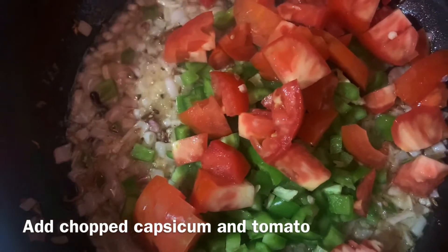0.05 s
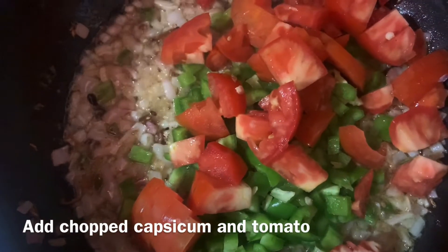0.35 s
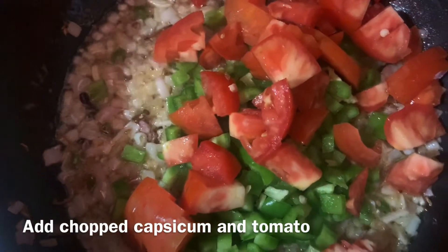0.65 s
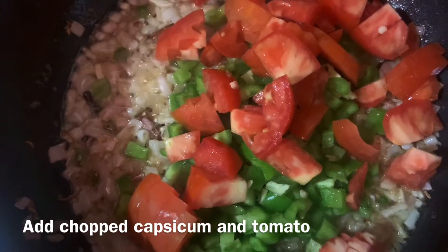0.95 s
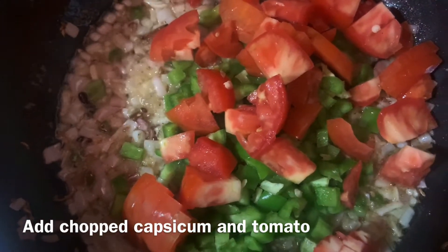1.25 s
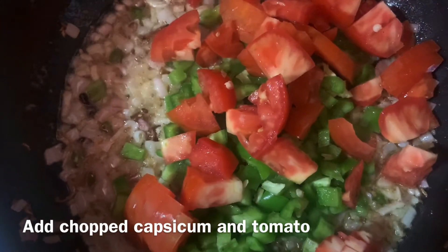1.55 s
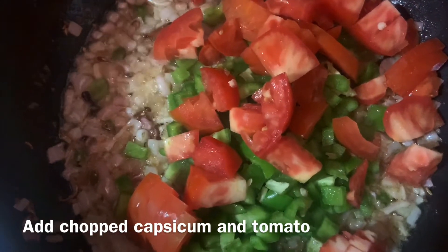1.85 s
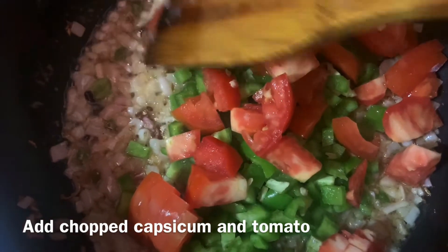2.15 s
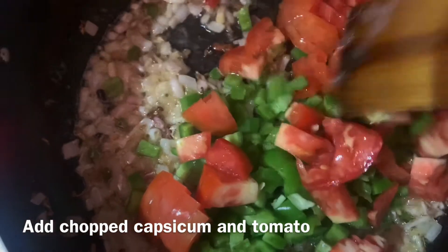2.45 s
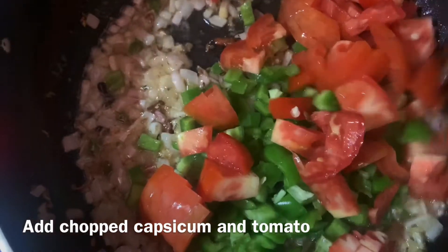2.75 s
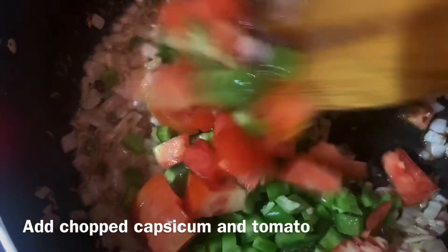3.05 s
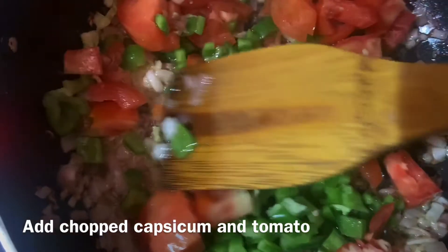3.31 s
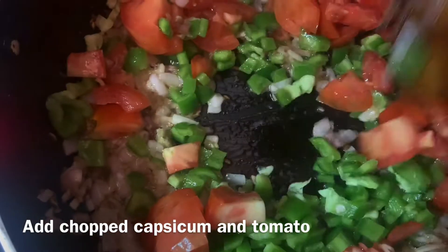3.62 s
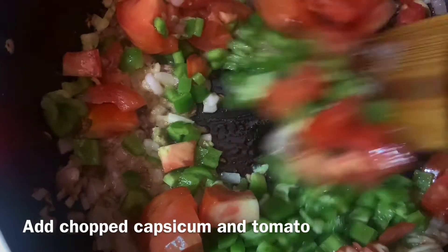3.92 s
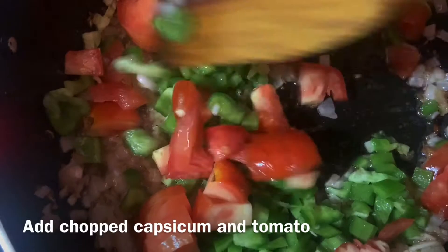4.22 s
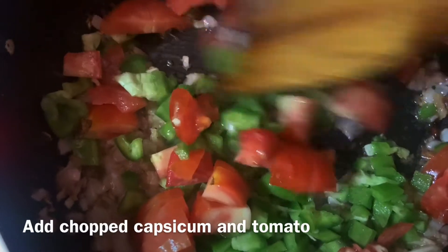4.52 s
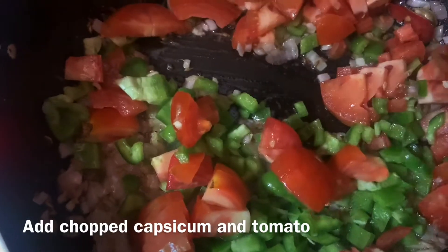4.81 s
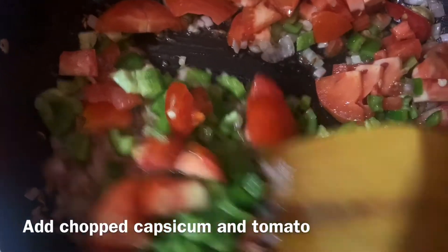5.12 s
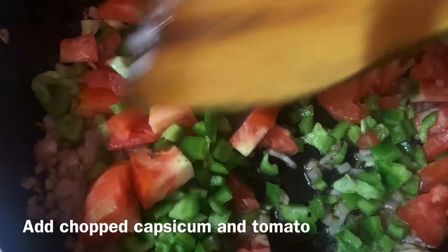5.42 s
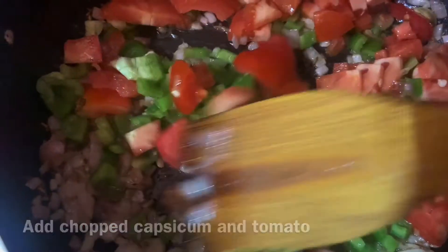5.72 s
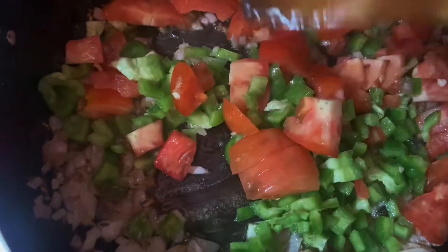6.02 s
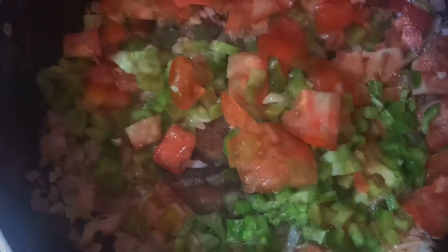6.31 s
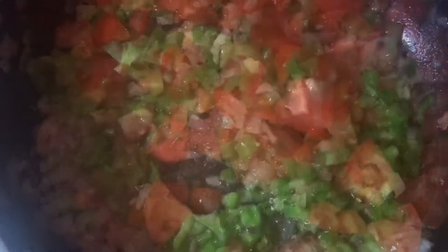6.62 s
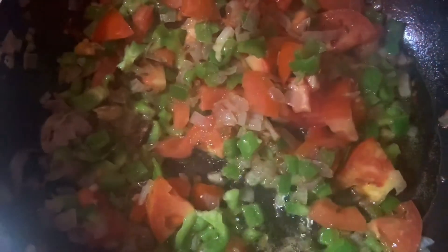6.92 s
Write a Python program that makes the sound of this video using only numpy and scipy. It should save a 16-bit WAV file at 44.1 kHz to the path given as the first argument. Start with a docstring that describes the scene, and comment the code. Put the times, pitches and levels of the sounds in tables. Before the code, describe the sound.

Chopped onion, pepper and tomato sizzle steadily in a hot pan, with sharp little spits of fat and a soft simmer of juice. A dull knock on the worktop and a utensil clink come early. Then a wooden spatula stirs with soft taps and faint scrapes, striking the pan more sharply near the end. A low burner rumble and hum lie underneath, heard close up in a home kitchen.

```python
"""Vegetables frying in a pan

Chopped onion, capsicum and tomato fry on a gas ring while a wooden spatula taps, scrapes and turns them. Tiny
steam bubbles burst in the fat, water drops spit and the juice simmers; burner and kitchen rumble below. Early
on the worktop is knocked and a utensil clinks. Two close microphones hear the pan's crackle alike in the lows,
while in the treble the right channel lags a little behind the left."""
import sys
import numpy as np
from scipy import signal
from scipy.fft import rfft, irfft, next_fast_len
from scipy.io import wavfile
from scipy.ndimage import uniform_filter1d

SR = 44100
rng = np.random.default_rng(int(sys.argv[2]) if len(sys.argv) > 2 else 0)


def inscribe(sig):
    """Save sig as 16-bit PCM at rate SR to the path in sys.argv[1].

    A 1-D sig is mono; a 2-D sig holds one channel per row.
    Samples are clipped to [-1, 1] before scaling.
    """
    pcm = np.round(np.clip(np.atleast_2d(sig).T, -1, 1) * 32767)
    wavfile.write(sys.argv[1], SR, pcm.astype(np.int16))


N = 311345
TIME = np.arange(N) / SR


def from_db(db):
    return 10 ** (np.asarray(db) / 20)


def unit_rms(x):
    return x / np.sqrt(np.mean(x ** 2) + 1e-20)


def in_time(rows):
    """Each value column of a time curve, per sample."""
    times, *columns = np.transpose(rows)
    return [np.interp(TIME, times, column) for column in columns]


def at_hz(points, hz):
    """Interpolate on a log-frequency axis."""
    known_hz, values = np.transpose(points)
    return np.interp(np.log(hz + 1), np.log(known_hz + 1), values)


def shaped(x, gain_at):
    """Filter by a gain given as a function of frequency."""
    size = next_fast_len(N + SR // 10)
    hz = np.fft.rfftfreq(size, 1 / SR)
    return irfft(rfft(x, size) * gain_at(hz), size)[..., :N]


def colour(x, spectrum):
    """Filter by a spectrum table; rms 1."""
    return unit_rms(shaped(x, lambda hz: from_db(at_hz(spectrum, hz))))


def drift(rate_hz):
    """Slow random wander; rms 1."""
    return unit_rms(shaped(rng.standard_normal(N), lambda hz: 1 / (1 + (hz / rate_hz) ** 2)))


def resonate(x, hz, width_hz):
    """Two-pole resonance, peak gain 1."""
    r = np.exp(-np.pi * width_hz / SR)
    numerator = np.array([1, 0, -1]) * (1 - r * r) / 2
    denominator = [1, -2 * r * np.cos(2 * np.pi * hz / SR), r * r]
    return signal.lfilter(numerator, denominator, x + 1e-18)


def steep_resonance(x, hz, width_hz):
    """Two equal resonances in series; rms 1."""
    return unit_rms(resonate(resonate(x, hz, width_hz), hz, width_hz))


def butterworth(x, edges_hz, kind):
    return signal.sosfilt(signal.butter(2, edges_hz, kind, fs=SR, output="sos"), x)


def add_at(track, start_s, sound):
    start = round(start_s * SR)
    track[start:start + len(sound)] += sound


def bursts(per_s, spread_db=0.0):
    """Random clicks at a running rms of 1; spread makes a few much larger."""
    sizes = from_db(spread_db * np.minimum(rng.exponential(1, N), 5.5))
    clicks = sizes * rng.choice([-1, 1], N) * (rng.random(N) < per_s / SR)
    return clicks / np.sqrt(uniform_filter1d(clicks ** 2, SR // 4) + 1e-9)


def bubbles(clicks, low_hz, high_hz, q, pitch_count):
    """Each click rings one bubble of random pitch for a few cycles; rms 1."""
    choice = rng.integers(0, pitch_count, N)
    pitches = np.geomspace(low_hz, high_hz, pitch_count)
    return unit_rms(sum(resonate(clicks * (choice == k), hz, hz / q) for k, hz in enumerate(pitches)))


# Diffuse field: f/Hz, left-right coherence
COHERENCE = [(100, 1), (250, 0.97), (400, 0.68), (560, 0.53), (720, 0.2), (1100, 0.62), (1700, 0.91),
             (2400, 0.63), (3200, 0.031), (4000, 0.1)]

def all_round(mid, side):
    """Two unrelated signals form a diffuse stereo field, alike in the bass."""
    def side_gain(hz):
        coherence = np.clip(at_hz(COHERENCE, hz), 0, .999)
        return np.sqrt((1 - coherence) / (1 + coherence))
    return mid + shaped(side, side_gain) * [[1], [-1]]


def from_pan(x, lag_s=.000233, alike_below_hz=2470):
    """The two channels agree in the lows; above a corner frequency the right one lags a little."""
    right = shaped(x, lambda hz: np.exp(-2j * np.pi * np.maximum(hz - alike_below_hz, 0) * lag_s))
    return np.array([x, right])


def reflections(x, t60_s=.067):
    """Hob and wall return a short, dense tail, different on each side."""
    t = TIME[:SR // 2]
    tails = rng.standard_normal((2, len(t))) * from_db(-60 * t / t60_s)
    tails /= np.sqrt(np.sum(tails ** 2, axis=1, keepdims=True))
    return signal.fftconvolve(x[None], tails, axes=1)[:, :N]


# Burner and kitchen: t/s, level/dB
RUMBLE_LEVEL = [(0, -40.5), (5.0, -40.5), (6.1, -41.5), (6.4, -44.5), (7.06, -41)]
# Low rush: f/Hz, level/dB
RUMBLE_SPECTRUM = [(20, -50), (35, -31), (55, -12.5), (78, -12), (95, -3.5), (125, 3), (175, -2.5),
                   (240, -2), (305, -7), (400, -4.5), (540, -9.5), (660, -30), (800, -10), (1100, -102)]
# Narrow noise bands: f/Hz, width/Hz, level/dB
RUMBLE_DRONES = [(148.5, 11, -52.5), (203, 27, -50.5), (240.8, 29, -50), (386, 55, -49.5), (478, 36, -51),
                 (561, 15, -51.5)]

def rumble(rush_gain_db=1.0, low_cut_hz=32):
    """Low rush of burner and kitchen, with a few wavering drones."""
    level_db, = in_time(RUMBLE_LEVEL)
    mid, side, drive = rng.standard_normal((3, N))
    rush = all_round(colour(mid, RUMBLE_SPECTRUM), colour(side, RUMBLE_SPECTRUM))
    rush = butterworth(rush, low_cut_hz, "high")
    drones = sum(from_db(db) * steep_resonance(drive, hz, width) for hz, width, db in RUMBLE_DRONES)
    return from_db(level_db + rush_gain_db) * rush + from_db(level_db - level_db.mean()) * drones


def hum(pitch_hz=103.2, wander_hz=3.1, gain_db=-5.0):
    """A low tone that follows the rumble's level, swelling and wavering in pitch at random."""
    level_db, = in_time(RUMBLE_LEVEL)
    phase = 2 * np.pi * np.cumsum(pitch_hz + wander_hz * drift(rate_hz=4.21)) / SR
    swell = 1 + .4 * drift(rate_hz=7)
    return from_db(level_db + gain_db) * swell * np.sqrt(2) * np.sin(phase)


# Simmering juice: t/s, level/dB
SIMMER_LEVEL = [(0.0, -36.5), (4.03, -34.5), (4.74, -36.5), (5.84, -35), (6.27, -38.5), (6.53, -40),
                (7.06, -36)]
# Bubbles in the juice: f/Hz, level/dB
SIMMER_SPECTRUM = [(360, -17), (620, -2), (736, -5.5), (860, -1.5), (1050, 1), (1210, -1.5), (1380, 4.5),
                   (1550, -0.5), (1750, 0), (2000, -1.5), (2300, -1), (2650, -6), (3400, -8), (4420, -111),
                   (7480, -120)]
# Hollow of the pan: f/Hz, width/Hz, level/dB re simmer
PAN_MODES = [(1002.7, 38, -15.5), (1115, 81, -10.5), (1560, 80, -13), (2163, 50, -15.5), (3310, 60, -21),
             (3842, 90, -19.5)]

def simmer(per_s=4000, spread_db=2.5, body_db=-2.0):
    """Larger, softer bubbles in the juice, coloured by the pan's hollow and ringing its resonances."""
    def bubbling():
        rings = sum(from_db(db) * steep_resonance(bursts(per_s, spread_db), hz, width)
                    for hz, width, db in PAN_MODES)
        body = colour(bursts(per_s, spread_db), SIMMER_SPECTRUM)
        return from_db(body_db) * body + rings
    level_db, = in_time(SIMMER_LEVEL)
    return from_db(level_db) * all_round(bubbling(), bubbling())


# Dull knock on the worktop: t/s, level/dB, tilt/(dB/octave)
WORKTOP_KNOCKS = [(0.04, -20, 1)]
# Worktop modes: f/Hz, level/dB, T60/s
WORKTOP_RING = [(265, 0, 0.13), (295, -1, 0.11), (325, -2, 0.08), (372, -4, 0.08), (472, -1, 0.14),
                (623, -15, .06)]
# A utensil clinks and settles: t/s, level/dB, tilt/(dB/octave)
UTENSIL_CLINKS = [(0.9345, -15, 0), (1.0003, -19, -8)]
# Utensil modes: f/Hz, level/dB, T60/s
UTENSIL_RING = [(1500, -3, 0.13), (1580, 0, 0.21), (1740, -6, 0.09), (2020, -2, 0.04), (2270, -1, 0.045),
                (2420, -7, 0.1), (3280, -9, 0.06), (3670, -11, 0.14)]

def struck(hits, modes, scatter_db=1.0, rattle_s=.002):
    """A brief, gritty contact rings every mode, each with a strength of its own."""
    out, t = np.zeros(N), TIME[:SR // 3]
    hz, mode_db, t60_s = np.transpose(modes)[:, :, None]
    polarity = (-1) ** np.arange(len(modes))[:, None]
    rattles = rng.standard_normal((len(hits), SR // 50)) * np.exp(-t[:SR // 50] / rattle_s)
    offsets_db = scatter_db * rng.standard_normal((len(hits), len(modes), 1))
    for (start_s, db, tilt), offset_db, rattle in zip(hits, offsets_db, rattles):
        strength_db = mode_db + tilt * np.log2(hz / hz[0]) + offset_db
        envelopes = from_db(strength_db - 60 * t / t60_s)
        ring = np.sum(polarity * envelopes * np.sin(2 * np.pi * hz * t), axis=0)
        blow = ring + .1 * signal.fftconvolve(ring, rattle)[:len(t)]
        add_at(out, start_s, from_db(db) * blow / np.max(np.abs(blow)))
    return out


# Short spatula strokes: t/s, length/s, level/dB, f/Hz, width/Hz
SCRAPE_STROKES = [(2.24, 0.26, -50, 1700, 1600), (2.54, 0.16, -50, 1300, 1400),
                  (3.207, 0.092, -39, 1400, 1600), (3.44, 0.27, -48, 70, 40),
                  (3.492, 0.075, -33.5, 125, 40)]

def scrapes(slips_per_s=900):
    """Wood sticks and slips on the pan; each stroke swells and fades."""
    out, slips = np.zeros(N), bursts(slips_per_s)
    for start_s, length_s, db, hz, width_hz in SCRAPE_STROKES:
        stroke = np.sin(np.pi * np.clip((TIME - start_s) / length_s, 0, 1))
        out += from_db(db) * stroke * steep_resonance(slips, hz, width_hz)
    return out


# Two long spatula sweeps: t/s, f/Hz, level/dB
SWEEP_PATH = [(5.42, 1100, -57), (5.5, 980, -47), (5.6, 915, -43), (5.68, 890, -39), (5.75, 980, -40),
              (5.81, 970, -57), (5.89, 1040, -65), (5.95, 1070, -35.5), (6.02, 1100, -52),
              (6.09, 1190, -49), (6.15, 1200, -66)]

def sweeps(slips_per_s=900, half_width_hz=55):
    """Slips ring one resonance, which dips as the blade reaches across the pan, then rises."""
    hz, db = in_time(SWEEP_PATH)
    carrier = np.exp(2j * np.pi * np.cumsum(hz) / SR)
    baseband = butterworth(bursts(slips_per_s) / carrier, half_width_hz, "low")
    ring = unit_rms(np.real(carrier * baseband))
    sliding = (TIME > SWEEP_PATH[0][0]) & (TIME < SWEEP_PATH[-1][0])
    return from_db(db) * ring * sliding


# Spatula and pieces knocking through the food: t/s, level/dB, f/Hz, width/Hz, decay/s
SOFT_TAPS = [(1.514, -25, 1560, 1500, .005), (2.044, -21, 1450, 1500, .005), (2.084, -22, 1390, 1000, .005),
             (2.264, -24, 1850, 1200, .005), (2.312, -17.5, 2340, 1500, .004),
             (2.519, -24, 1700, 1200, .005), (2.583, -19, 1400, 1000, .005), (2.607, -19, 950, 900, .009),
             (2.611, -20.5, 2100, 1200, .005), (3.288, -20, 939, 1500, .005),
             (4.4852, -16, 2850, 1300, .002), (6.092, -24, 1200, 1500, .003),
             (6.225, -25, 1400, 1200, .003)]
# The spatula's hard edge on the pan: t/s, level/dB, f/Hz, width/Hz, decay/s
EDGE_TAPS = [(5.8415, -5, 5500, 2000, .0014), (6.0845, -8.5, 6800, 5000, .0013),
             (6.092, -16, 3100, 2400, .0015), (6.1865, -10, 4600, 2400, .0019)]

def taps(hits, gain_db, tick_gain, tick_s=.00054):
    """Wood meets the pan: a broad tick and a dry crunch, at each hit's own pitch."""
    out, t = np.zeros(N), TIME[:SR // 16]
    for start_s, db, hz, width_hz, decay_s in hits:
        grit = rng.standard_normal(len(t))
        crunch = resonate(grit * np.exp(-t / decay_s), hz, width_hz)
        crunch = resonate(crunch, hz, 2 * width_hz)
        tick = resonate(grit * np.exp(-t / tick_s), hz, width_hz=hz)
        tap = crunch + tick_gain * tick
        add_at(out, start_s, from_db(db + gain_db) * tap / np.max(np.abs(tap)))
    return out


# Wet pieces stirred onto bare metal: t/s, level/dB re sizzle
FIZZ_LEVEL = [(0, -25), (2.3, -12), (2.8, -7), (3.65, -11), (4.8, -7.5), (5.9, -11), (6.5, -14)]

def fine_fizz(sizzle_db):
    """Moisture flashes off the hot metal in tiny, high bubbles."""
    contact_db, = in_time(FIZZ_LEVEL)
    clicks = bursts(per_s=5000, spread_db=13.0)
    fizz = bubbles(clicks, low_hz=9500, high_hz=17000, q=6, pitch_count=10)
    return from_db(sizzle_db + contact_db) * fizz


# Fat spits hard under resting food, finer once stirred: t/s, burst size spread/dB
BURST_SPREAD = [(0, 4.0), (2.0, 3), (3.5, 3), (5.0, 3.5), (6.3, 2), (7.06, -1)]
# Sizzling fat: f/Hz, level/dB
SIZZLE_SPECTRUM = [(800, -42), (2000, -5.5), (3000, -14.5), (3700, -4.3), (4200, -1), (4800, 0.6),
                   (5600, 2.2), (6500, 1.9), (7500, 0.3), (8600, 2.8), (10500, -1.5), (12500, -4.3),
                   (15500, -2.5)]

def sizzle(level_db, per_s=7500, snap_gain=.087, hiss_db=-10, cluster_db=1.4, surge_db=.35):
    """Steam bubbles snap and ring in the fat, in clusters and surges, over a hiss of smaller ones."""
    spread_db, = in_time(BURST_SPREAD)
    clicks = bursts(per_s, spread_db)
    clicks *= from_db(cluster_db * drift(rate_hz=28) + surge_db * drift(rate_hz=10))
    rings = bubbles(clicks, low_hz=2500, high_hz=18000, q=4.5, pitch_count=30)
    crackle = unit_rms(rings + snap_gain * clicks)
    hiss = from_db(hiss_db) * rng.standard_normal(N)
    return from_db(level_db) * colour(crackle + hiss, SIZZLE_SPECTRUM)


def haze(sizzle_db, gain_db=-17):
    """Fizz scattered by the pan wall reaches each microphone by paths of its own."""
    return from_db(sizzle_db + gain_db) * colour(rng.standard_normal((2, N)), SIZZLE_SPECTRUM)


def small_spit_rows(sizzle_db, count=90, low_hz=5630, high_hz=8500, scatter_db=1.6):
    """Random lesser spits, likeliest while the fat spatters hard; their level follows the sizzle."""
    spread_db, = in_time(BURST_SPREAD)
    cumulative_chance = np.cumsum(np.maximum(spread_db, 0) ** 2)
    when, pitch = rng.random((count, 2)).T
    starts = np.searchsorted(cumulative_chance, when * cumulative_chance[-SR // 50])
    ping_db, snap_db = sizzle_db[starts] + scatter_db * rng.standard_normal((count, 2)).T
    hz = low_hz * (high_hz / low_hz) ** pitch
    return list(zip(starts / SR, ping_db + 3.5, hz, snap_db + 1.0))


# Loudest spits: t/s, ping level/dB, f/Hz, snap level/dB
LOUD_SPITS = [(0.1296, -16, 5600, -23), (0.1783, -15, 7180, -30), (0.2128, -17, 8500, -23),
              (0.2362, -12, 6660, -18), (0.2612, -16, 7900, -28), (0.333, -16, 5590, -14),
              (0.3729, -24, 8080, -15), (0.4328, -13, 6360, -26), (0.4868, -19, 5400, -19),
              (0.5873, -17, 7200, -28), (0.81, -17, 7900, -24), (0.8455, -18, 8050, -14),
              (0.9714, -24, 8590, -17), (1.0655, -18, 8220, -14), (1.0709, -19, 5120, -18),
              (1.1417, -16, 7270, -17), (1.1524, -16, 6560, -21), (1.2807, -16, 5100, -26),
              (1.3371, -14, 6120, -20), (1.422, -16, 6690, -18), (1.4369, -15, 7210, -22),
              (1.5111, -15, 5710, -35), (1.5155, -17, 7100, -21), (1.6601, -18, 8370, -18),
              (1.8124, -15, 6280, -32), (1.8742, -18, 7300, -18), (2.0151, -24, 8360, -18),
              (2.0243, -14, 5720, -26), (2.045, -15, 5250, -25), (2.329, -17, 7210, -18),
              (2.4625, -12, 6210, -28), (2.5722, -16, 6280, -22), (2.5921, -13, 6470, -22),
              (2.6079, -12, 5710, -22), (2.7248, -19, 7350, -17), (2.7434, -17, 8220, -14),
              (2.7815, -15, 6110, -21), (2.9201, -12, 7950, -26), (2.9284, -17, 7080, -17),
              (2.963, -17, 7000, -21), (3.1931, -16, 7620, -19), (3.2887, -16, 5500, -22),
              (3.3217, -16, 8620, -14), (3.3449, -13, 5750, -13), (3.3567, -16, 6130, -17),
              (3.6468, -15, 6400, -22), (3.6532, -19, 8200, -16), (3.6699, -15, 6650, -16),
              (3.6893, -17, 6590, -14), (3.7379, -14, 5800, -18), (3.8227, -23, 6370, -12),
              (3.8372, -14, 8020, -19), (3.8623, -15, 6500, -23), (3.8719, -14, 6400, -22),
              (3.9156, -19, 8010, -14), (4.201, -16, 7350, -17), (4.3432, -19, 7320, -17),
              (4.3478, -14, 6200, -21), (4.4537, -21, 8310, -17), (4.4859, -19, 5800, -19),
              (4.7116, -16, 5550, -23), (4.7676, -20, 6980, -12.5), (4.9267, -22, 7180, -11),
              (5.1118, -20, 7950, -14), (5.553, -16, 5500, -26), (5.6855, -15, 8070, -27),
              (5.7136, -15, 7600, -19), (5.8673, -22, 7600, -15), (5.9173, -15, 7040, -31),
              (6.12, -16, 6190, -25), (6.7496, -15, 8530, -18)]

def spits(sizzle_db, gain_db=1.1, ping_cycles=2.6, spray_s=.0025, snap_s=.0004, hard_snap_db=-16):
    """Water drops explode: a short ping, a puff of spray, a mid thump and a bright, cracking snap."""
    out, t = np.zeros(N), TIME[:SR // 100]
    for start_s, ping_db, hz, snap_db in list(LOUD_SPITS) + small_spit_rows(sizzle_db):
        noise, grit = rng.standard_normal((2, len(t)))
        ping = np.cos(2 * np.pi * hz * t) * np.exp(-hz * t / ping_cycles)
        spray = .27 * noise * np.exp(-t / spray_s)
        crack = grit * np.exp(-t / snap_s)
        thump = .25 * resonate(crack, hz=2400, width_hz=2000)
        pop = butterworth(ping + spray, [hz / 1.6, hz * 1.4], "band") + thump
        snap_low_hz = 11500 if snap_db > hard_snap_db else 9500  # hard snaps are brighter
        snap = butterworth(crack, [snap_low_hz, 16000], "band") + .22 * crack
        for part, db in (pop, ping_db), (snap, snap_db):
            onset_rms = np.sqrt(np.mean(part[:SR // 1400] ** 2))
            add_at(out, start_s, from_db(db + gain_db) * part / onset_rms)
    return out


# Sizzle flares as the food is turned, then slackens: t/s, level/dB
SIZZLE_LEVEL = [(0.0, -27.5), (0.61, -30), (1.12, -30), (1.51, -29), (2.06, -30.5), (2.77, -28),
                (3.07, -29), (3.7, -26.5), (4.15, -27), (5.33, -30), (5.88, -27), (6.35, -31), (6.55, -32),
                (7.06, -30)]

def frying(gain_db=3.0, room_db=-22):
    """Hot fat sizzles, fizzes and spits, heard directly, off the pan wall and off the hob and nearby wall."""
    sizzle_db = in_time(SIZZLE_LEVEL)[0] + gain_db
    fat = sizzle(sizzle_db) + fine_fizz(sizzle_db) + spits(sizzle_db)
    return from_pan(fat) + haze(sizzle_db) + from_db(room_db) * reflections(fat)


def scene(handling_room_db=-9):
    """Frying and stirring over the simmer, rumble and hum."""
    fry = frying()
    clinks = struck(UTENSIL_CLINKS, UTENSIL_RING)
    knocks = struck(WORKTOP_KNOCKS, WORKTOP_RING)
    edge_taps = taps(EDGE_TAPS, gain_db=2, tick_gain=.3)
    soft_taps = taps(SOFT_TAPS, gain_db=1.3, tick_gain=.58)
    handling = soft_taps + edge_taps + scrapes() + sweeps() + clinks + knocks
    room = from_db(handling_room_db) * reflections(handling)
    return fry + simmer() + from_pan(handling) + room + rumble() + hum()


def record(dry):
    """Soft clipping, then a steep treble cut."""
    cutoff_hz = 15720
    return shaped(np.tanh(dry), lambda hz: 1 / np.sqrt(1 + (hz / cutoff_hz) ** 400))


dry = scene()
out = record(dry)
inscribe(out)
```